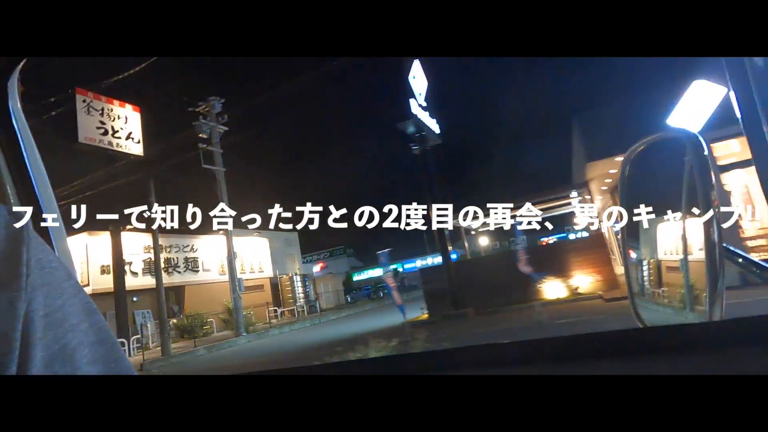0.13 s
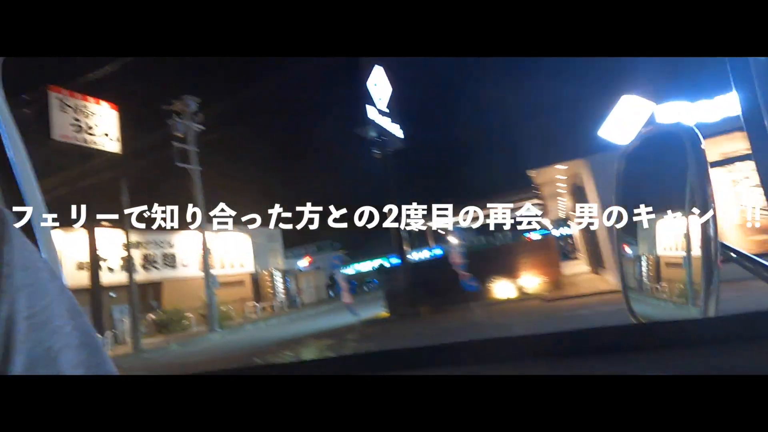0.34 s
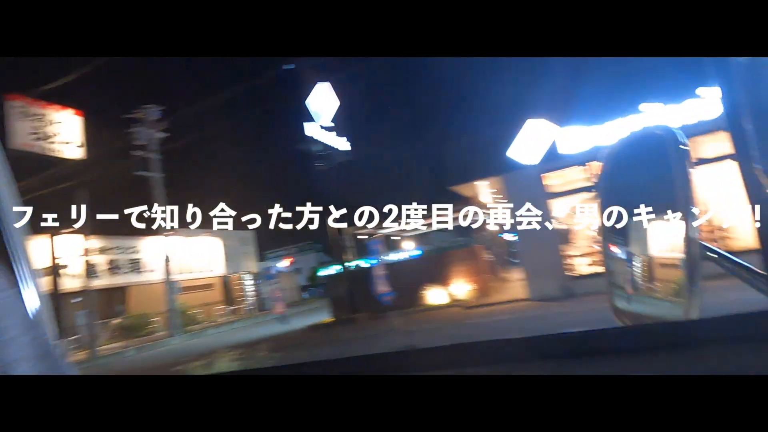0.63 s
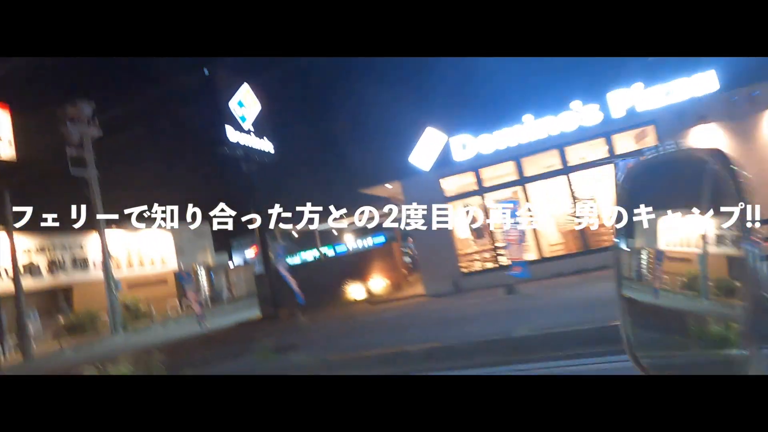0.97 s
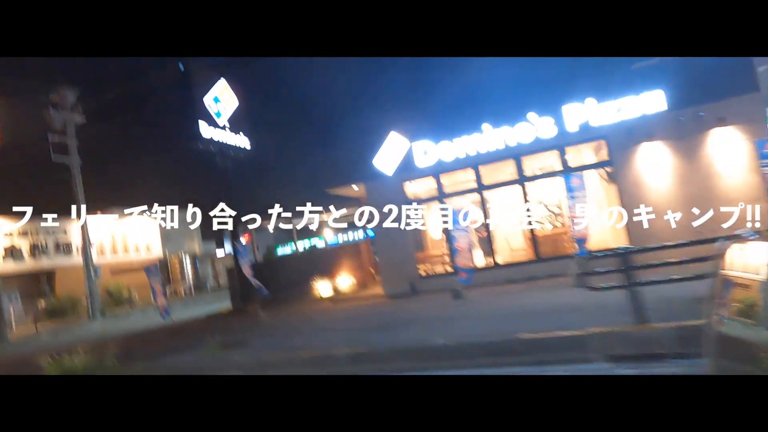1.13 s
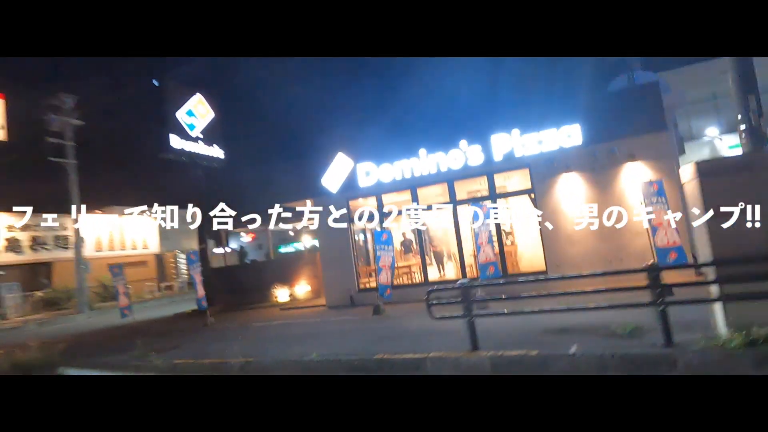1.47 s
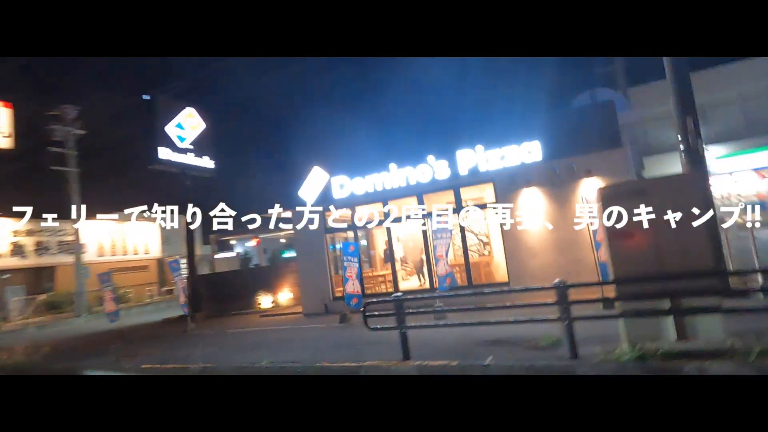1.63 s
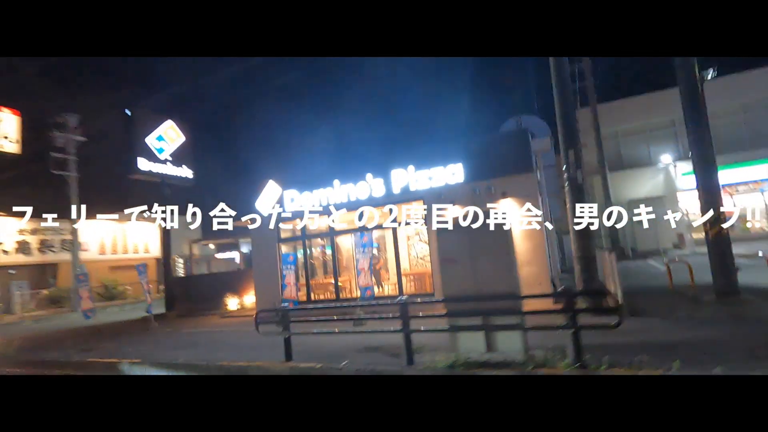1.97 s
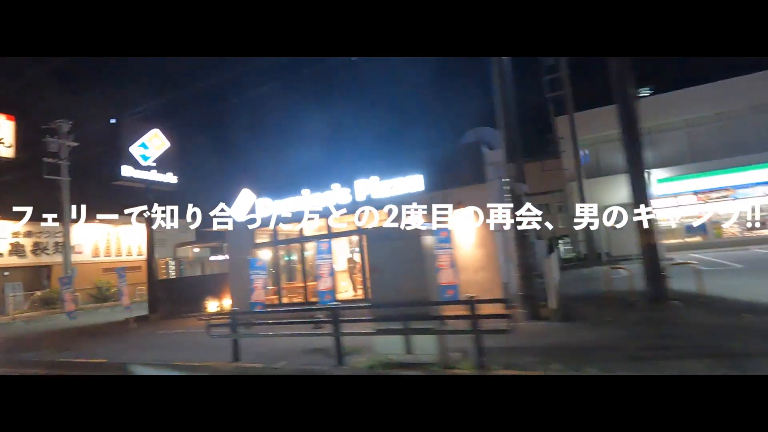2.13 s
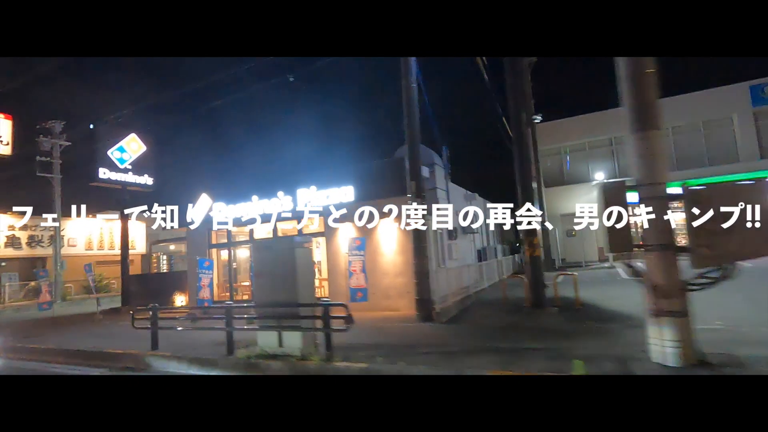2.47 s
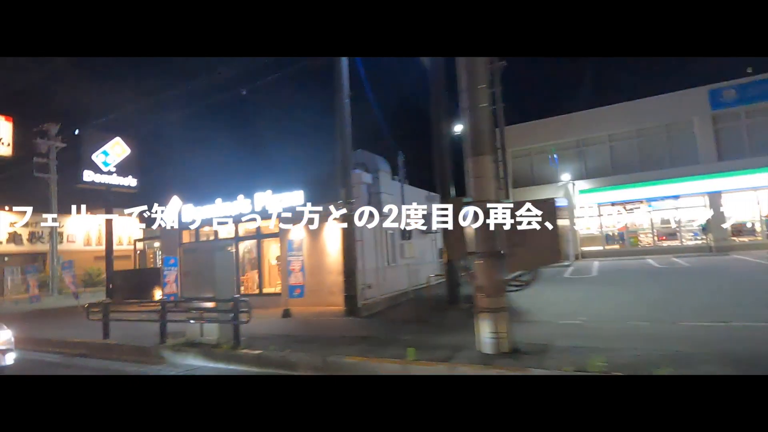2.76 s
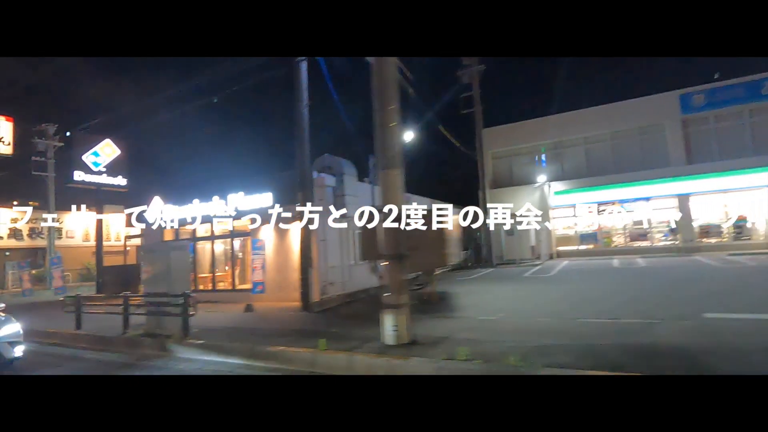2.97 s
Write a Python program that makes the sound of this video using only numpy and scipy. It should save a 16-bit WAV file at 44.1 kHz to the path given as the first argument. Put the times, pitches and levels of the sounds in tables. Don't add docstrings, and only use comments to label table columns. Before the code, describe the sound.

A small van's engine drones low and rises steadily as it pulls away, heard by a dull microphone in the cabin; early road thumps and a tiny metallic chink, then growing tyre roar and hiss.

```python
import sys
import numpy as np
from scipy import signal
from scipy.fft import rfft, irfft, next_fast_len
from scipy.io import wavfile

SR = 44100
rng = np.random.default_rng(int(sys.argv[2]) if len(sys.argv) > 2 else 0)


def volts_from_db(level):
    exponent = np.asarray(level, float) / 20
    return 10 ** exponent


def generate_wav(signal):
    frames = np.transpose(np.atleast_2d(signal))
    scaled = np.clip(frames, -1, 1) * 32767
    pcm = np.round(scaled).astype(np.int16)
    wavfile.write(sys.argv[1], SR, pcm)


N = 136710
T = np.arange(N) / SR


def rms_one(x):
    return x / np.sqrt(np.mean(x ** 2) + 1e-20)


def in_time(rows):
    return np.interp(T, *np.transpose(rows))


def drift(rate_hz):
    r = np.exp(-2 * np.pi * rate_hz * 40 / SR)
    noise = rng.standard_normal(N // 40 + 2002)
    slow = signal.lfilter([1], [1, -2 * r, r * r], noise)[2000:]
    return np.interp(np.arange(N) / 40, np.arange(len(slow)), rms_one(slow - slow.mean()))


def coloured(spectrum, patchy_db):
    hz, db = np.transpose(spectrum)
    edges = hz[0] * 2 ** np.arange(0, np.log2(hz[-1] / hz[0]) + .1, 1 / 3)
    white = rng.standard_normal((2, N + SR))
    out = 0
    for k, (low, high) in enumerate(zip(edges, np.minimum(edges[1:], .45 * SR))):
        sos = signal.butter(2, [low, high], "band", fs=SR, output="sos")
        band = signal.sosfilt(sos, white[k % 2])[SR:]
        band_db = np.interp(np.log(low * high) / 2, np.log(hz), db)
        out = out + band * volts_from_db(band_db + patchy_db * drift(5.1))
    return rms_one(out)


def resonance(x, hz, width_hz):
    r = np.exp(-np.pi * width_hz / SR)
    return signal.lfilter([1 - r * r, 0, r * r - 1], [1, -2 * r * np.cos(2 * np.pi * hz / SR), r * r], x) / 2


# time in seconds, turns per second in Hz.
CRANK_SPEED = [(0.0, 28.3), (0.62, 31.6), (1.24, 34.86), (1.86, 37.55), (2.48, 40.22), (3.1, 42.63)]


def crank_speed():
    return in_time(CRANK_SPEED)


# multiple of crank speed, level in dB midway, growth with load in dB per second.
ENGINE_ORDERS = [(1, -5, 0), (1.5, -12, 0), (2, -5, 0), (2.5, -9, .4), (3, -10.5, 1.5), (3.5, -10.8, -1.4),
                 (4, -8, 1), (4.5, -13.3, 0), (5, -13, 3.7), (5.5, -16, -1), (6, -13, -.5),
                 (6.5, -13.8, 5.5), (7, -17.5, -.8), (7.5, -17.5, 1), (8, -19.3, -1.5), (8.5, -21, .7),
                 (9, -25, 0), (9.5, -28.5, 0), (10, -30.5, 0), (10.5, -29, 0), (12, -33, 0)]
# pitch in Hz, width in Hz, gain in dB.
CABIN_BOOMS = [(33.7, 3.5, 14), (43.5, 3, 8), (75, 5, 10), (107, 5, 4.5), (114, 5, 12), (132.8, 8.6, 20),
               (167.3, 5, 10), (189, 15.7, 15.4), (205.8, 5.5, 12.8), (284, 8, 6), (316, 43, 9.3),
               (375, 5, 10), (400, 19, 13.8)]


def engine(crank_hz):
    engine_db, direct_db, midway_s = -29, -9, 1.55
    spread_turns, cycle_jitter_turns, slow_slip_turns = .4, .03, .05
    turns = np.cumsum(crank_hz) / SR
    out = 0
    for order, db, growth_db in ENGINE_ORDERS:
        hz = order * crank_hz
        body_power = volts_from_db(direct_db) ** 2
        for boom_hz, width_hz, gain_db in CABIN_BOOMS:
            body_power = body_power + volts_from_db(gain_db) ** 2 / (1 + (2 * (hz - boom_hz) / width_hz) ** 2)
        wobble = spread_turns * order ** 2 + cycle_jitter_turns * drift(5) + slow_slip_turns * drift(.4)
        level_db = db + growth_db * (T - midway_s) + 1.5 * drift(3)
        tone = np.sin(2 * np.pi * (order * turns + wobble))
        out = out + np.sqrt(body_power) * volts_from_db(level_db) * tone
    return volts_from_db(engine_db) * out


# time in seconds, level in dB.
ROUGHNESS = [(0.0, -16), (0.12, -16.5), (0.15, -19), (1.36, -16.5), (1.43, -25), (2.11, -19.5), (2.17, -17),
             (3.05, -21), (3.1, -13.5)]
# pitch in Hz, level in dB per Hz.
RUMBLE_COLOUR = [(10, -11), (25, -6), (52, 0), (75, 0), (105, -3), (140, -10), (240, -16), (400, -32)]
# centre in seconds, level in dB, pitch in Hz, length in seconds.
LOW_HEAVES = [
    (-.003, -18, 23, 0.014),
    (1.268, -28, 4.6, 0.083),
    (2.6, -24.5, 24, 0.048),
    (3.095, -13, 37, 0.011),
]


def rumble():
    heaves = 0
    for centre, db, hz, length in LOW_HEAVES:
        age = T - centre
        heaves = heaves + volts_from_db(db) * np.exp(-.5 * (age / length) ** 2) * np.sin(2 * np.pi * hz * age)
    return volts_from_db(-3.5 + in_time(ROUGHNESS)) * coloured(RUMBLE_COLOUR, patchy_db=1) + heaves


# start in seconds, level in dB, pitch in Hz.
ROAD_JOINTS = [
    (0.048, -24.5, 68.4),
    (0.086, -16.5, 55.7),
    (0.202, -13, 56.7),
    (0.214, -21, 73.7),
    (.66, -20, 71.2),
    (0.831, -25.5, 113.5),
    (1.997, -22.5, 73.9),
    (2.82, -20, 60.5),
]


def bumps():
    rise_s = 0.025
    out = 0
    for start, db, hz in ROAD_JOINTS:
        age = np.maximum(T - start, 0)
        swell = age / rise_s * np.exp(1 - age / rise_s)
        out = out + volts_from_db(db) * swell * np.sin(2 * np.pi * hz * age)
    return out


# time in seconds, level in dB.
ROAR_SWELL = [(0.15, -56.5), (0.83, -56.5), (0.98, -50.5), (1.06, -52), (1.5, -49), (2.0, -48.5),
              (2.12, -46), (2.18, -49), (2.74, -47.5), (3.08, -47)]
# pitch in Hz, level in dB per Hz.
TYRE_COLOUR = [(160, -19.5), (250, -0.5), (330, -10), (450, -8), (560, -10), (710, -8), (1100, -12.5),
               (2200, -29.5)]
# pitch in Hz, level in dB per Hz.
HISS_COLOUR = [(1200, -10), (2000, -2), (3000, -2.5), (3800, -4.5), (5000, -11), (8000, -17.5),
               (12000, -19.5), (16500, -12.5)]
TYRE_FOLLOWS = 0.75


def tyre_swell():
    swell_db = in_time(ROAR_SWELL)
    return volts_from_db(TYRE_FOLLOWS * (swell_db - swell_db.max()))


def roar(crank_hz):
    tyre_db, hiss_db, throb_depth = -31, 2, 0.11
    throb = 1 + throb_depth * np.sin(4 * np.pi * np.cumsum(crank_hz) / SR)
    tyres = volts_from_db(tyre_db) * tyre_swell() * coloured(TYRE_COLOUR, patchy_db=1.46)
    hiss = volts_from_db(hiss_db + in_time(ROAR_SWELL)) * throb * coloured(HISS_COLOUR, patchy_db=.5)
    return tyres + hiss


# pitch in Hz, width in Hz, level in dB.
TRIM_PANELS = [(500, 45, -49), (585, 40, -48), (665, 50, -46), (715, 55, -45), (870, 70, -49)]


def panels():
    hum = 0
    for hz, width_hz, db in TRIM_PANELS:
        noise = rng.standard_normal(N)
        narrow = resonance(resonance(noise, hz, width_hz), hz, width_hz)
        hum = hum + volts_from_db(db + 4.4 * drift(3.5)) * rms_one(narrow)
    return hum * tyre_swell()


# centre in seconds, length in seconds, level in dB, pitch in Hz, width in Hz.
GRIT_SCUFFS = [
    (2.075, .03, -54, 3600, 250),
    (2.124, .005, -48, 2900, 1800),
    (2.28, .006, -54, 3950, 500),
    (.96, .035, -60, 6500, 4000),
]


def scuff():
    out = 0
    for centre, length, db, hz, width_hz in GRIT_SCUFFS:
        puff = np.exp(-.5 * ((T - centre) / length) ** 2)
        out = out + volts_from_db(db) * puff * rms_one(resonance(rng.standard_normal(N), hz, width_hz))
    return out


# start in seconds, length in seconds, level in dB.
TRINKET_SHAKES = [
    (.034, 0.0176, -80.5),
    (.051, .02, -86.5),
    (.072, 0.014, -90),
    (.097, .012, -91),
]
# pitch in Hz, level in dB, time to fall 60 dB in seconds.
TRINKET_MODES = [(6750, 0, .03), (7500, 1, .02), (7850, -2, .02), (8380, -1, .015), (8800, 1, .012),
                 (9600, 2, .006), (10200, 4, .008), (11600, 8, .008), (12500, 7, .007), (13200, 6, .005),
                 (14300, 6, .004)]


def trinket():
    touches_per_s = 3500
    shake = sum(volts_from_db(db) * (T > start) * (T < start + length) for start, length, db in TRINKET_SHAKES)
    touches = shake * (rng.random(N) < touches_per_s / SR)
    out = np.zeros(N)
    for hz, db, t60 in TRINKET_MODES:
        r = volts_from_db(-60 / (t60 * SR))
        w = 2 * np.pi * hz / SR
        strikes = volts_from_db(db + 16.5) * touches * rng.standard_normal(N) + 1e-18
        out += signal.lfilter([0, np.sin(w)], [1, -2 * r * np.cos(w), r * r], strikes)
    return out


def scene():
    crank_hz = crank_speed()
    driving = engine(crank_hz) + rumble() + bumps() + roar(crank_hz)
    details = panels() + scuff() + trinket()
    return (driving + details)[None]


def top_cut(x):
    return signal.sosfilt(signal.butter(12, 15655, fs=SR, output="sos"), x)


# pitch in Hz, gain in dB.
HOUSING = [(4600, 0.5), (5500, -2), (8300, -4), (9000, -9), (10000, -11.5), (11000, -19), (12500, -14.5),
           (15300, -35)]


def record(dry):
    hz, db = np.transpose(HOUSING)
    size = next_fast_len(2 * N)
    x = np.pad(dry, ((0, 0), (0, size - N)), "reflect")
    gain_db = np.interp(np.log(np.fft.rfftfreq(size, 1 / SR) + 1), np.log(hz), db)
    x = irfft(rfft(x) * volts_from_db(gain_db), size)[:, :N]
    return top_cut(0.76 * np.tanh(x / 0.78))


dry = scene()
out = record(dry)
generate_wav(out)
```